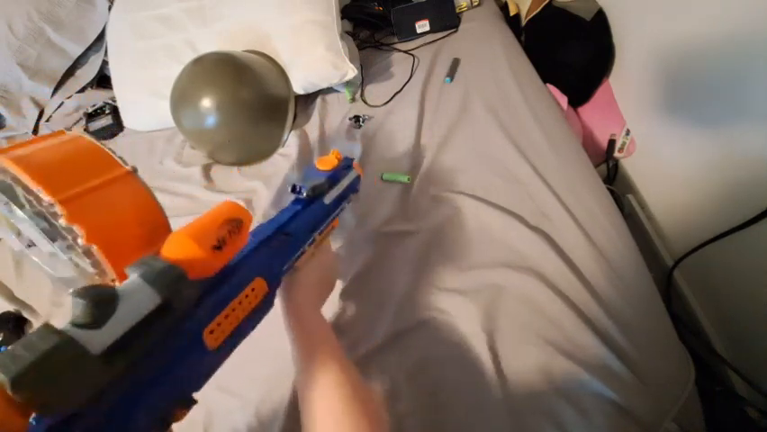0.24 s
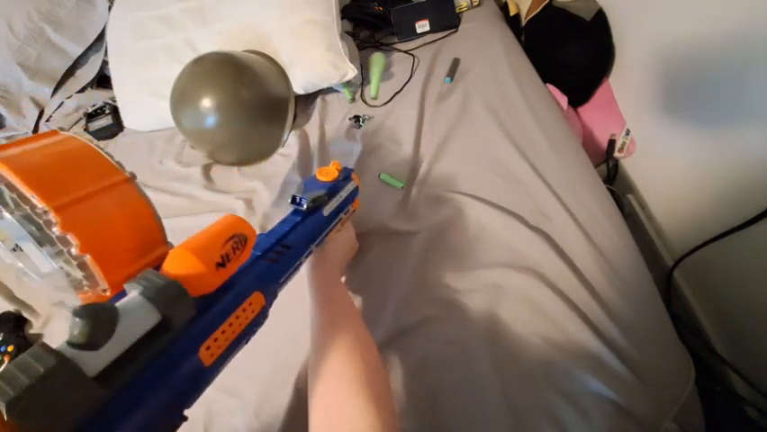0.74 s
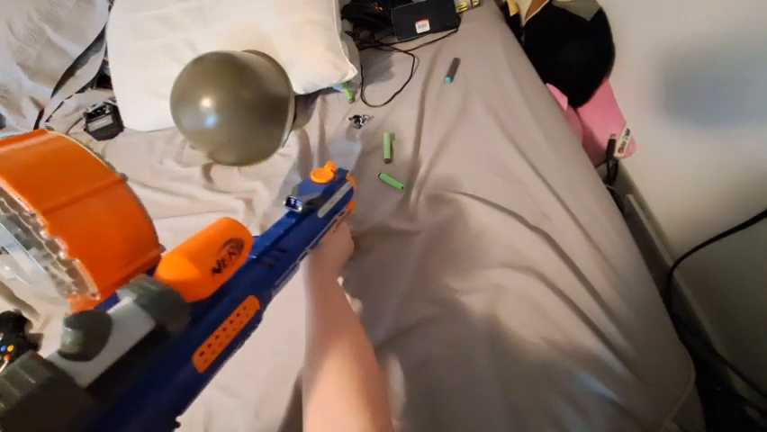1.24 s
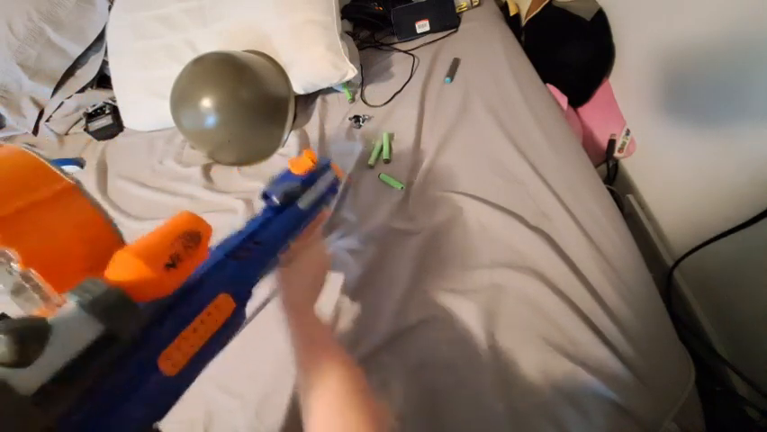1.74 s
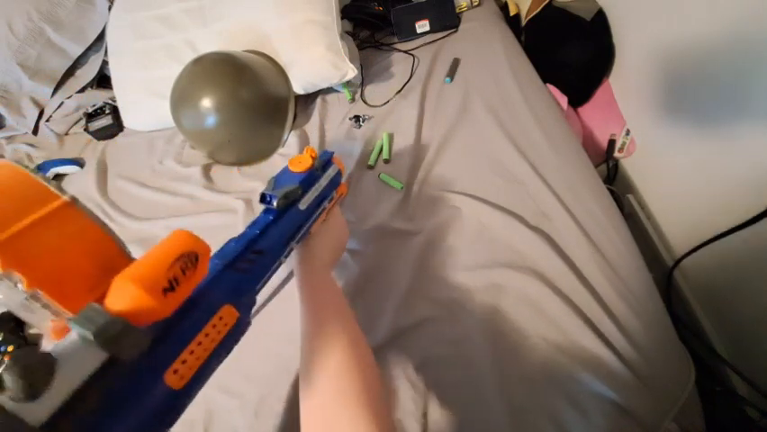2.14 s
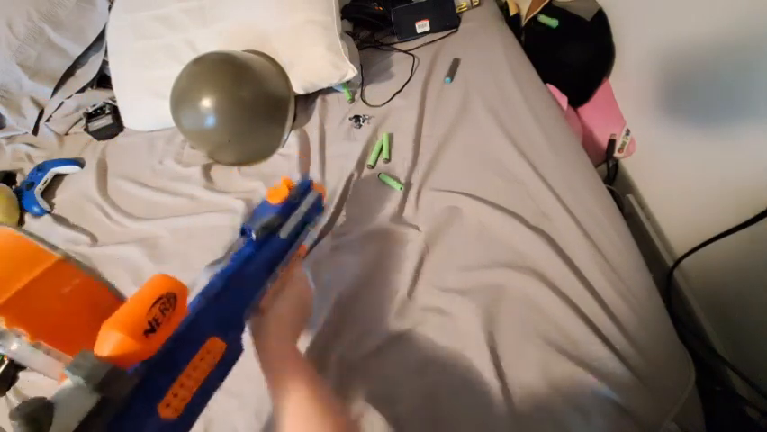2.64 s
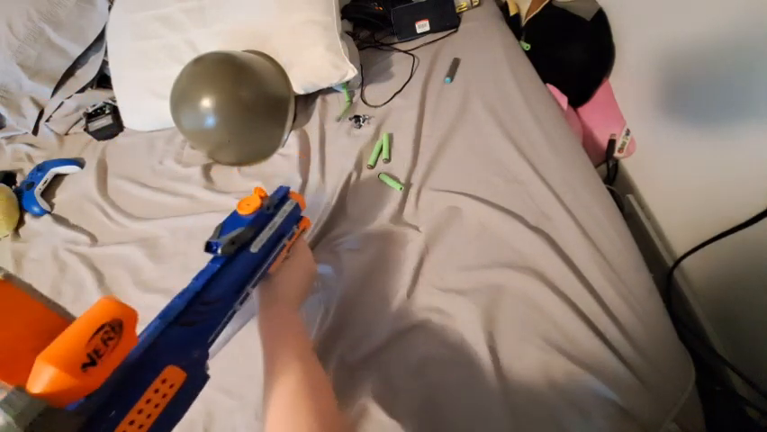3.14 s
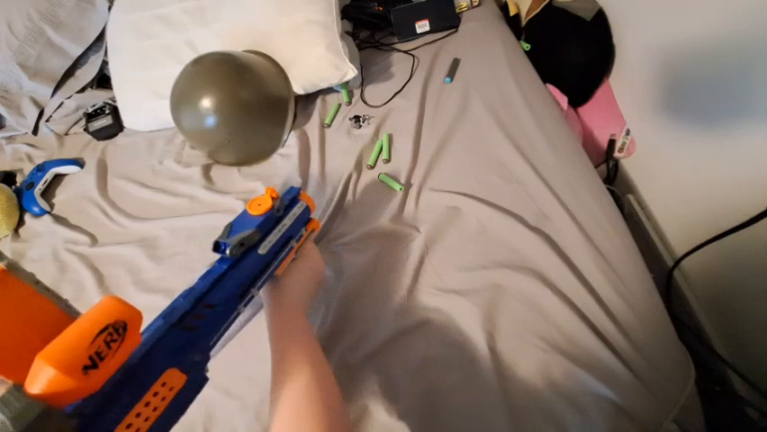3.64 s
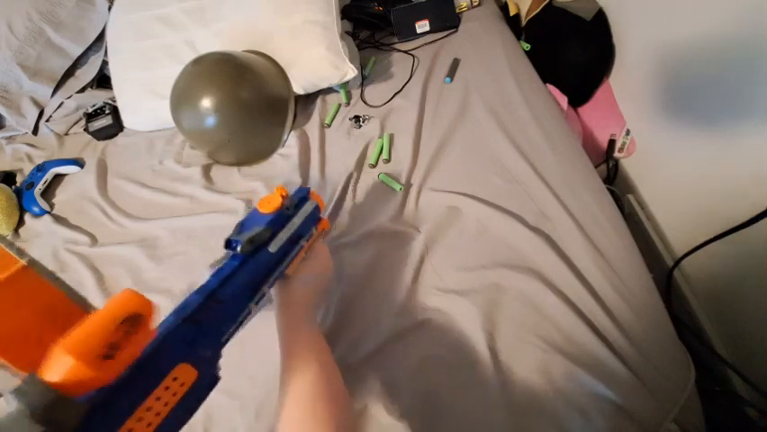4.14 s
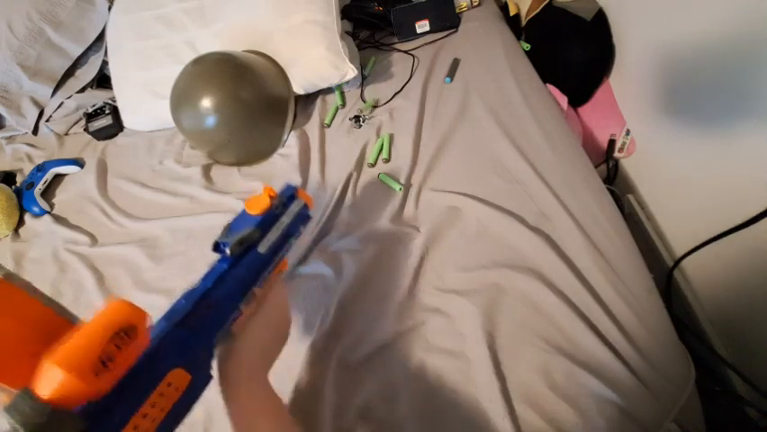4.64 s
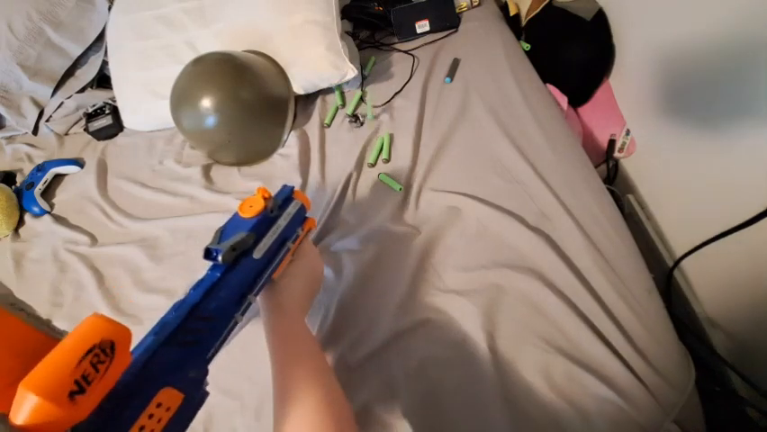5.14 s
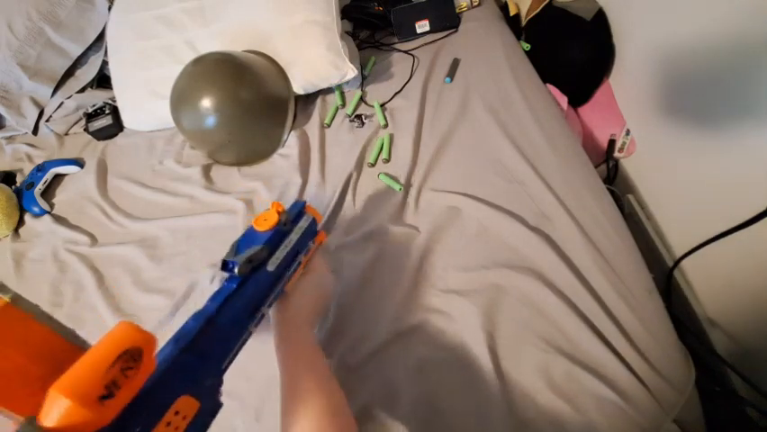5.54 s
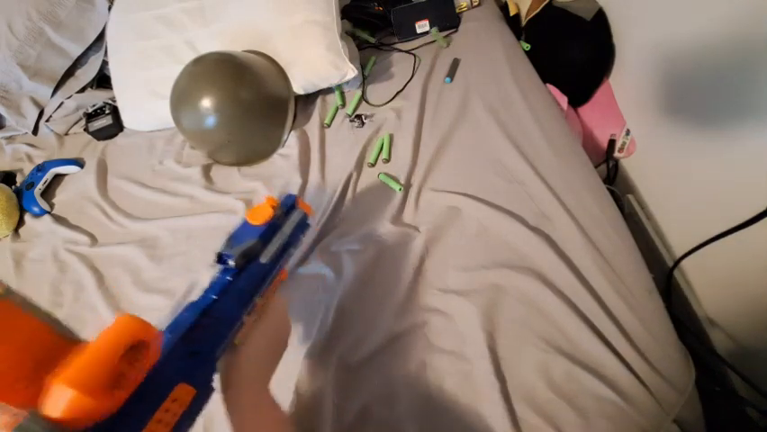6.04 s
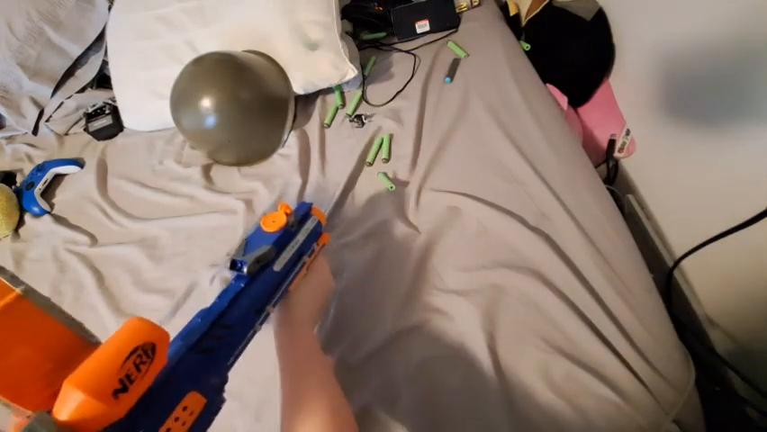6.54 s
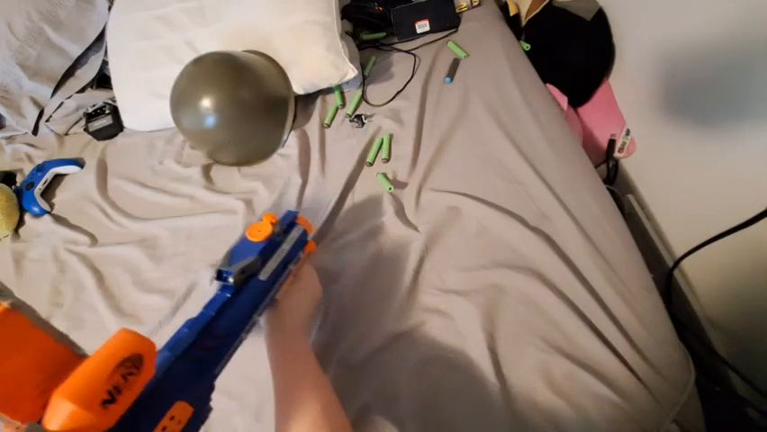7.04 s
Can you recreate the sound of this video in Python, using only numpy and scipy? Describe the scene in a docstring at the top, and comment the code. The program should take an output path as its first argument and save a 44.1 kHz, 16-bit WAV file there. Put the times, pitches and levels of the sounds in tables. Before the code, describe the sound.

A pump-action toy dart blaster is cocked and fired ten times, about an arm's length from the microphone in a small bedroom. The first pull comes at about 0.1 seconds: the grip clicks free, rasps briefly and clacks against the rear stop. At 0.4 seconds it slides forward and locks with a quick cluster of clicks. At 0.6 seconds the spring fires with a sharp snap, a slightly lower hollow pop and a dull puff of air. This three-beat cycle repeats evenly, with further shots at about 1.3, 2.1, 2.9, 3.7, 4.3, 5.0, 5.7, 6.4 and 7.2 seconds. Every hit combines a bright plastic crack with the knock of a hollow shell, varying a little in strength. Faint creaks and small ticks fall between the strokes. The room rings briefly after each clack, and a quiet, steady low appliance hum lies underneath throughout.

```python
"""Plastic clicks and a short rasp over a low hum: a pump-action toy dart blaster is cocked and fired
ten times, an arm's length away in a small bedroom. Each cycle, the grip slides back over its catches to
the rear stop, slides forward and locks; then the spring slams the plunger home with a puff of air.
Every blow is a bright plastic crack plus a knock of the hollow shell. The room rings briefly."""
import sys
import numpy as np
from scipy import signal
from scipy.fft import rfft, irfft
from scipy.io import wavfile

SR = 44100
rng = np.random.default_rng(int(sys.argv[2]) if len(sys.argv) > 2 else 0)


def int16_out(signal):
    """Quantize to a 16-bit WAV file."""
    q = np.round(np.clip(np.atleast_2d(signal).T, -1, 1) * 32767)
    wavfile.write(sys.argv[1], SR, q.astype(np.int16))


N = 321048
TIME_S, RING_S = np.arange(N) / SR, np.arange(4096) / SR
BLOW_GAIN = np.sqrt(.005 / RING_S[-1])  # refers the rms of a blow to 5 ms

# hard plastic contact spectrum: freq_hz, density_db
CRACK_SPECTRUM = [(600, -31), (1400, -32.5), (2100, 0.5), (3100, -1.5), (4200, 0), (5300, -0.5), (6400, -5),
                  (7700, -1), (8800, -8.5), (12000, -5), (16000, -10)]
# rubbed shell spectrum: freq_hz, density_db
RUB_SPECTRUM = [(60, -4), (140, -12), (300, -16), (520, 7), (1000, 5.5), (1400, 5), (1900, 9.5),
                (3000, -56.5)]
# back strokes: start_s, sear_s, stop_s, catch_db, sear_db, stop_db, rub_db
PULLS = [(.1245, .1731, .1961, -1.5, 1.5, -1.3, -.5), (.8405, .884, .902, 1, .5, .5, .5),
         (1.5684, 1.6148, 1.6318, .5, 1, -1.2, 2.5), (2.5175, 2.5642, 2.5831, -1.5, .5, .8, 2.5),
         (3.2055, 3.2561, 3.2766, -.5, -1, .5, -1), (3.8885, 3.9326, 3.9515, 1, -3, 1.3, 4.5),
         (4.5492, 4.5961, 4.616, 3.5, 0, -2.2, 0), (5.2795, 5.3249, 5.3454, 2.5, -1, 1, 2),
         (5.945, 5.9949, 6.0153, -1, 1.5, .8, -2.5), (6.6552, 6.7068, 6.7277, -1.5, 0, -.5, -2.5)]
# forward strokes: start_s, feed_s, shut_s, lock_s, start_db, feed_db, breech_db, lock_db, rub_db
PUSHES = [(.3307, .3632, .3960, .4171, 2, 0, -.5, 1.5, -1),
          (1.039, 1.0676, 1.1085, 1.1264, -2, -1, -1, -1, -3),
          (1.767, 1.8039, 1.8418, 1.8608, 2, 0, .5, -.5, -1.5),
          (2.7009, 2.7298, 2.7787, 2.8236, 1, -2, -4.5, -5, -2.5),
          (3.4122, 3.4392, 3.4741, 3.4911, 0, -2, 0, 1.3, -1),
          (4.083, 4.105, 4.1401, 4.158, -1, -4, 2, 1.5, 2.5),
          (4.7362, 4.7652, 4.8081, 4.8245, 3.5, -.5, -.5, .7, 0),
          (5.4715, 5.4975, 5.5349, 5.5534, 1, 4, 1.3, -2, -1.5),
          (6.1286, 6.1695, 6.2169, 6.2353, -6, 2, -3, 1, 0),
          (6.8744, 6.9178, 6.9592, 6.9766, -2, -.5, -.7, -.5, .5)]
# shots: release_s, trigger_lead_s, rebound_delay_s,
# trigger_db, spring_db, slam_db, rebound_db, recoil_db, ticks_db
SHOTS = [(.6096, .032, .031, 2, -2, 0, -4, -53, 1), (1.344, .037, .032, -1, 1.5, -1, 0, -50, -2),
         (2.1182, .047, .040, -1, 2, -2.5, -1, -39, 0), (2.8975, .036, .034, -2, -2, 1.5, 2, -38, -1),
         (3.6622, .030, .0324, 1, .5, 0, 1.5, -42, -1), (4.3446, .0364, .033, 2.5, -1, 2.5, 2, -50, 2),
         (5.0248, .041, .0337, -1.5, 3.3, 3.5, 3, -42, 1), (5.731, .042, .043, .5, -1.5, -1, -1, -51, -1),
         (6.4054, .049, .0365, -7, -1, -.5, -1.5, -46, -4), (7.1592, .054, .0315, -4, 0, -12, 4.5, -41, -1)]


def undb(db):
    """Decibels to gain."""
    return 10 ** (np.asarray(db) / 20)


def curve(points, hz):
    """Interpolate (freq_hz, value) rows on a log-frequency axis."""
    freq_hz, value = np.transpose(points)
    return np.interp(np.log(hz + 1), np.log(freq_hz), value)


def level(x, db):
    """Scale to an rms level."""
    return x * undb(db) / np.sqrt(np.mean(x ** 2))


def add(out, start_s, x):
    """Mix x in at start_s."""
    i = max(int(start_s * SR), 0)
    out[:, i:i + x.shape[1]] += x[:, :max(N - i, 0)]


def stereo_field(hz):
    """Random complex amplitudes, left and right: alike in the bass, less so in the treble."""
    # channel likeness: freq_hz, correlation
    likeness = [(40, 0.47), (150, 0.93), (500, 0.9), (1000, 0.67), (2000, 0.46), (5000, 0.17),
                (16000, 0.13)]
    shared, left, right = rng.standard_normal((3, len(hz))) + 1j * rng.standard_normal((3, len(hz)))
    alike = np.clip(curve(likeness, hz), 0, 1)
    return np.sqrt(alike) * shared + np.sqrt(1 - alike) * np.array([left, right])


def noise(spectrum, size, ripple_db=0):
    """Coloured stereo noise, rms 1, with optional random resonances."""
    hz = np.fft.rfftfreq(size, 1 / SR)
    ripple = np.interp(hz, np.geomspace(300, 16000, 48), rng.standard_normal(48))
    return level(irfft(stereo_field(hz) * undb(curve(spectrum, hz) + ripple_db * ripple), size), 0)


def background(air_db=-55):
    """An appliance hums steadily in quiet room air."""
    # hum partials: pitch_hz, rms_db
    partials = [(57.0, -51.5), (98.4, -62), (109.6, -68)]
    # room air: freq_hz, density_db
    air_spectrum = [(20, -30), (50, -51), (80, -32), (110, -0.5), (200, 3), (400, -5), (800, -10.5),
                    (2000, -10.5), (6000, -20.5), (16000, -29)]
    hum = sum(np.sqrt(2) * undb(db) * np.sin(2 * np.pi * (hz * TIME_S + rng.random()))
              for hz, db in partials)
    return hum + noise(air_spectrum, N) * undb(air_db)


def standing_waves(x):
    """Low room modes linger between strokes."""
    # room modes: pitch_hz, gain_db, t60_s
    room_modes = [(140, -31, 1), (217, -31, 0.96), (385, -27.5, 1)]
    out = 0
    for hz, db, t60_s in room_modes:
        pole = np.exp((2j * np.pi * hz - np.log(1000) / t60_s) / SR)
        ring = signal.lfilter([1], [1, -pole], x.mean(axis=0)).imag
        out = out + undb(db) * np.sqrt(1 - abs(pole) ** 2) * ring
    return out


def bedroom(x, wet_db=-5, build_s=.0039, size=16384, segments=48):
    """Dense reflections build and fade, treble first; their pattern changes as the blaster moves."""
    t = np.arange(size) / SR
    hz = np.fft.rfftfreq(size, 1 / SR)
    t60_s = curve([(150, .42), (600, .26), (1500, .24), (5000, .23), (14000, .2)], hz)
    band_index = np.digitize(hz, [300, 1800, 8000])
    bands = [band_index == b for b in np.unique(band_index)]
    bedding = undb(curve([(200, -2), (1000, -4), (2500, .0068)], hz))  # absorbs lows and mids
    out = np.zeros((2, N))
    for span in np.array_split(np.arange(N), segments):
        field = stereo_field(hz) * bedding
        tail = sum(irfft(field * band, size) * np.exp(-np.log(1000) * t / t60_s[band].mean())
                   for band in bands)
        tail = level(tail * (1 - np.exp(-t / build_s)), wet_db) / np.sqrt(size)
        add(out, span[0] / SR, signal.fftconvolve(x[:, span], tail, axes=1))
    return out


def stick_slip(rate_hz, spread_db, decay_s):
    """Friction envelope, rms 1: tiny uneven catches, each dying away."""
    catches = rng.random(N) < rate_hz / SR
    sizes = undb(spread_db * np.clip(rng.standard_normal(N), -2, 2))
    power = signal.lfilter([1], [1, -np.exp(-2 / (decay_s * SR))], (catches * sizes) ** 2)
    return level(np.sqrt(power + 1e-12), 0)


def handling(drawn_db=-38.5, rest_db=-72, rise_db_per_s=110, fall_db_per_s=80):
    """Plastic creaks faintly in the hands, most with the spring fully drawn."""
    rustle = noise(RUB_SPECTRUM, N) + undb(-1) * noise(CRACK_SPECTRUM, N)
    slack_db = np.min([np.maximum(rise_db_per_s * (stop_s - TIME_S), fall_db_per_s * (TIME_S - stop_s))
                       for _, _, stop_s, *_ in PULLS], axis=0)
    strain = undb(drawn_db - slack_db) + undb(rest_db)
    return rustle * stick_slip(rate_hz=250, spread_db=8, decay_s=.0069) * strain


def slide(swell_db=7, onset_s=.0055):
    """The grip rubs along its rails, louder as it gathers speed."""
    # strokes, slightly outlasting their clicks: start_s, end_s, shell_db, scrape_db
    back = [(start_s, stop_s + .007, db - 31, db - 26.5) for start_s, _, stop_s, *_, db in PULLS]
    forward = [(start_s - .012, shut_s + .012, db - 30, db - 31.5)
               for start_s, _, shut_s, *_, db in PUSHES]
    friction = stick_slip(rate_hz=350, spread_db=6, decay_s=.002)
    shell = friction * noise(RUB_SPECTRUM, N, ripple_db=2)
    scrape = friction * noise(CRACK_SPECTRUM, N)
    out = np.zeros((2, N))
    for start_s, end_s, shell_db, scrape_db in back + forward:
        i, j = int(start_s * SR), int(end_s * SR)
        speed = undb(np.linspace(-swell_db, 0, j - i)) * (1 - np.exp(-TIME_S[:j - i] / onset_s))
        add(out, start_s, speed * (undb(shell_db) * shell[:, i:j] + undb(scrape_db) * scrape[:, i:j]))
    return out


def knock(decay_s, focus_hz, width_oct, boost_db, scatter_db=2.1, detune=.018, chatter_db=-9):
    """The shell rings with a brief chatter; the spot struck favours modes near focus_hz."""
    # hollow shell modes: pitch_hz, gain_db, t60_s
    shell_modes = [(143.4, -14, .09), (179.3, -14.5, 0.076), (216, -20, 0.084), (251, -10, 0.06),
                   (342, -2.5, 0.035), (399.7, -6.5, 0.056), (521, 2, 0.028), (595, 1, 0.023),
                   (692, -1, 0.035), (789, -5, 0.053), (872.4, 1, 0.036), (943, -5, 0.022), (995, 3, 0.035),
                   (1058, 3.5, 0.021), (1196, 2, 0.033), (1337, 1.5, 0.034), (1512, 5, 0.017),
                   (1677, 4.5, 0.017), (1800, 1.5, 0.022), (1940, 8.5, 0.012)]
    hz, db, t60_s = np.transpose(shell_modes)
    gain_jitter, pitch_jitter = rng.standard_normal((2, len(hz)))
    db = db + boost_db * np.exp(-(np.log2(hz / focus_hz) / width_oct) ** 2) + scatter_db * gain_jitter
    field = stereo_field(hz)
    field /= np.sqrt(np.mean(abs(field) ** 2, axis=0))
    modes = np.exp(np.outer(2j * np.pi * hz * (1 + detune * pitch_jitter) - np.log(1000) / t60_s, RING_S))
    attack = 1 - np.exp(-RING_S / (.53 * decay_s))  # a long contact swells slowly
    ring = ((field * undb(db)) @ modes).imag * attack
    chatter = noise(RUB_SPECTRUM, len(RING_S)) * RING_S * np.exp(-RING_S / decay_s)
    return level(ring, 0) + level(chatter, chatter_db)


def crack(decay_s, bounce_db=2.3, bounce_s=.00129):
    """Plastic on plastic: a bright burst of milliseconds, roughened by tiny bounces."""
    jitter = np.clip(rng.standard_normal(128), -2, 2)
    bounces = undb(bounce_db * np.interp(RING_S, np.arange(128) * bounce_s, jitter))
    envelope = RING_S ** .59 * np.exp(-RING_S / decay_s)
    return noise(CRACK_SPECTRUM, len(RING_S), ripple_db=.7) * bounces * envelope


def contacts(part, times_s, gains_db):
    """Repeat a part's contacts at each time, offset by that time's gain."""
    return [(start_s + delay_s, knock_db + db, crack_db + db, decay_s)
            for start_s, db in zip(times_s, gains_db) for delay_s, knock_db, crack_db, decay_s in part]


def blows(hits, focus_hz, width_oct, boost_db, shell_db):
    """One shell knock and one crack per contact."""
    out = np.zeros((2, N))
    for start_s, knock_db, crack_db, decay_s in hits:
        add(out, start_s, level(knock(decay_s, focus_hz, width_oct, boost_db), knock_db + shell_db))
        add(out, start_s, level(crack(decay_s), crack_db))
    return out * BLOW_GAIN


def clicks(hits):
    """Small parts strike all over the shell and favour no single mode."""
    return blows(hits, focus_hz=910, width_oct=1, boost_db=4.5, shell_db=-1.5)


def extra_clicks():
    """Single plastic clicks: before the first pull, after two shots, and as the blaster is handled."""
    # single contacts: start_s, knock_db, crack_db, decay_s
    single_clicks = [(.0905, -41, -44, .003), (.1073, -31.5, -23, .004), (1.7341, -34, -42, .0024),
                     (1.9915, -36, -39, .0021), (2.0439, -43, -42, .0022), (2.2678, -44, -35, .011),
                     (3.8473, -38, -36, .0036), (4.0235, -40, -34, .0021), (6.8315, -32, -41, .0055)]
    return clicks(single_clicks)


def pull():
    """The grip leaves its catch, draws the plunger over the sear and hits the rear stop."""
    # contacts per part: delay_s, knock_db, crack_db, decay_s
    catch = [(-.009, -41, -38, .003), (0, -33.5, -24.3, .003), (.014, -28.5, -16, .0044),
             (.027, -32, -24.5, .0018)]
    sear = [(-.009, -26.5, -22.5, .0014), (0, -37, -18, .0016)]
    rear_stop = [(0, -15.8, -15, .004)]
    start_s, sear_s, stop_s, catch_db, sear_db, stop_db, _ = np.transpose(PULLS)
    stops = contacts(rear_stop, stop_s, stop_db)
    rear = blows(stops, focus_hz=1000, width_oct=.16, boost_db=8, shell_db=2)  # always the same spot
    return rear + clicks(contacts(catch, start_s, catch_db) + contacts(sear, sear_s, sear_db))


def push():
    """The grip sets off forward, feeds a dart from the drum, shuts the breech and locks."""
    # contacts per part: delay_s, knock_db, crack_db, decay_s
    push_off = [(0, -35, -28.5, .004)]
    dart_feed = [(0, -23.5, -25, .0055), (.014, -27, -27.5, .0022)]
    breech = [(-.005, -27, -27, .003), (0, -27, -14, .004), (.008, -34, -18, .0015)]
    lock = [(0, -23.5, -14.6, .002)]
    start_s, feed_s, shut_s, lock_s, start_db, feed_db, breech_db, lock_db, _ = np.transpose(PUSHES)
    closing = contacts(breech, shut_s, breech_db) + contacts(lock, lock_s, lock_db)
    front = blows(closing, focus_hz=880, width_oct=.3, boost_db=7.5, shell_db=2.5)
    return front + clicks(contacts(push_off, start_s, start_db) + contacts(dart_feed, feed_s, feed_db))


def recoil(pitch_hz=48, decay_s=.016, gain_db=-1, delay_s=.016):
    """Each shot jolts the blaster: a soft thud of a cycle or two."""
    envelope = RING_S / decay_s * np.exp(1 - RING_S / decay_s) * np.linspace(1, 0, len(RING_S))
    thud = np.sin(2 * np.pi * pitch_hz * RING_S) * envelope
    out = np.zeros((2, N))
    for release_s, *_, recoil_db, _ in SHOTS:
        add(out, release_s + delay_s, undb(recoil_db + gain_db) * thud[None])
    return out


def puff(delay_s=.005, decay_s=.003, puff_db=-29):
    """A dull puff leaves the muzzle, scaled by the spring's release."""
    # air driving the dart: freq_hz, density_db
    puff_spectrum = [(50, -30), (110, -10), (250, -2), (450, 1), (700, -12), (1500, -35)]
    out = np.zeros((2, N))
    for release_s, _, _, _, spring_db, *_ in SHOTS:
        burst = noise(puff_spectrum, len(RING_S)) * RING_S * np.exp(-RING_S / decay_s)
        add(out, release_s + delay_s, level(burst, puff_db + spring_db))
    return out * BLOW_GAIN


def fire():
    """The trigger clicks, the spring lets go, the plunger slams home and rebounds; two ticks follow."""
    # contacts per part: delay_s, knock_db, crack_db, decay_s
    trigger = [(0, -41, -36, .0035), (.016, -38, -38, .003)]
    spring = [(-.003, -38, -36, .003), (0, -22.8, -19.3, .0058)]
    slam = [(.013, -35, -16.5, .0017), (.024, -48, -25.5, .005)]
    rebound = [(0, -31, -17, .0048), (.008, -26.5, -26, .0045)]
    ticks = [(.157, -40, -37.5, .004), (.180, -38, -42, .003)]
    (release_s, lead_s, rebound_delay_s,
     trigger_db, spring_db, slam_db, rebound_db, _, ticks_db) = np.transpose(SHOTS)
    plunger = contacts(spring, release_s, spring_db) + contacts(slam, release_s, slam_db)
    plunger += contacts(rebound, release_s + rebound_delay_s, rebound_db)
    # the plunger drives the whole air chamber, so a shot pops lower
    pop = blows(plunger, focus_hz=520, width_oct=.45, boost_db=5, shell_db=.5)
    light_hits = contacts(trigger, release_s - lead_s, trigger_db) + contacts(ticks, release_s, ticks_db)
    return pop + puff() + clicks(light_hits)


def scene():
    """The blaster, its room and the hum."""
    blaster = pull() + push() + fire() + extra_clicks() + slide() + handling()
    return blaster + bedroom(blaster) + undb(-7) * standing_waves(blaster) + recoil() + background()


def record(dry):
    """The left channel is slightly earlier and louder, with a treble resonance; the top is cut."""
    # channel imbalance: freq_hz, left_minus_right_db
    imbalance = [(100, 1.6), (500, 2), (1000, 2.7), (2200, 2.4), (4000, 3.6), (5200, 4.8), (6400, 3.5),
                 (7700, 9), (9000, 2.4), (10500, 1.4), (12500, 3.1), (16000, 2)]
    right_lag_s, cutoff_hz = .00013, 16000
    hz = np.fft.rfftfreq(N, 1 / SR)
    gains = undb(np.outer([.5, -.5], curve(imbalance, hz)))
    gains /= np.sqrt(np.mean(gains ** 2, axis=0))
    lag = np.exp(-2j * np.pi * np.outer([0, right_lag_s], hz))
    channels = irfft(rfft(dry) * gains * lag, N)
    return signal.sosfilt(signal.ellip(10, .2, 70, cutoff_hz, fs=SR, output="sos"), channels)


dry = scene()
out = record(dry)
int16_out(out)
```